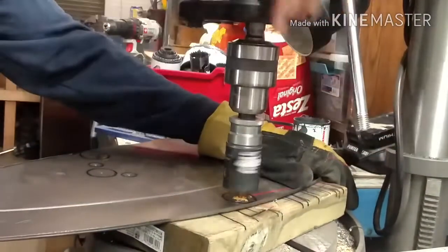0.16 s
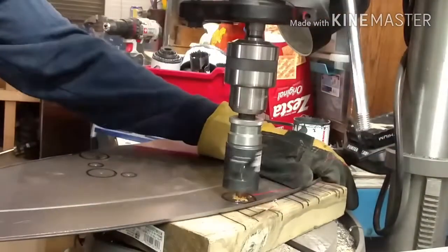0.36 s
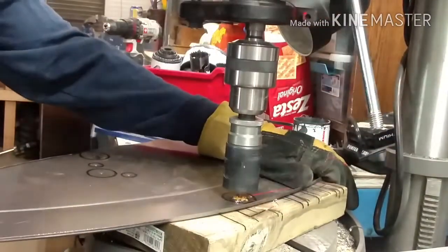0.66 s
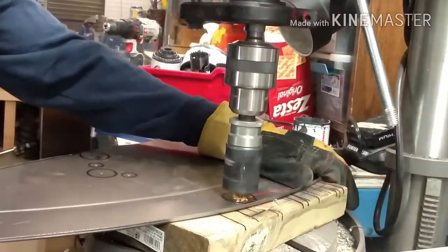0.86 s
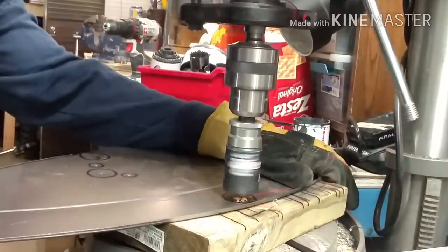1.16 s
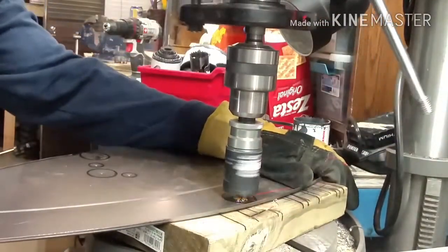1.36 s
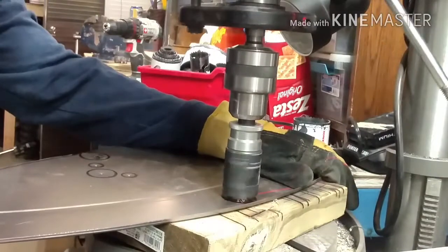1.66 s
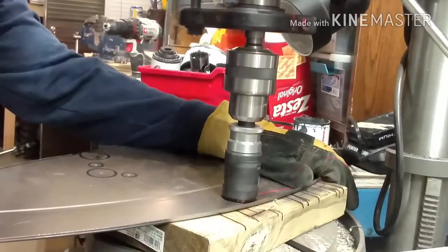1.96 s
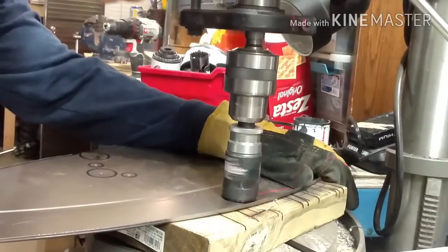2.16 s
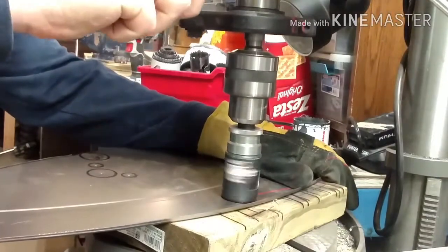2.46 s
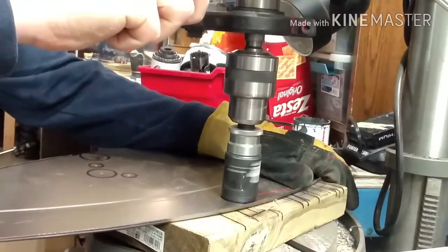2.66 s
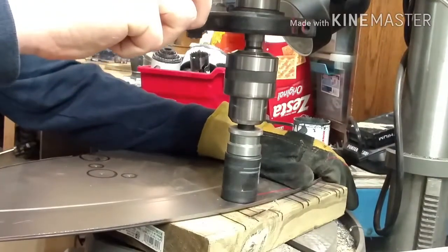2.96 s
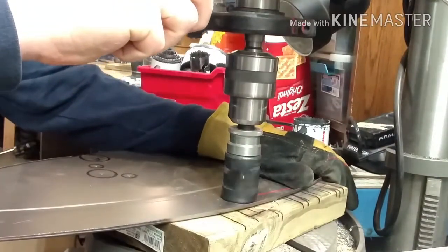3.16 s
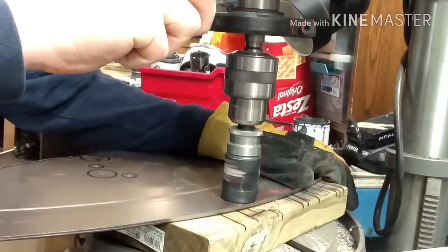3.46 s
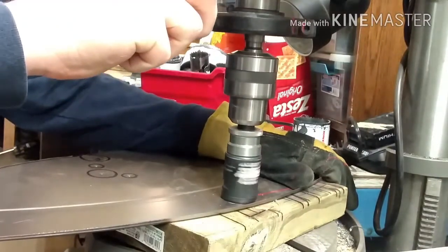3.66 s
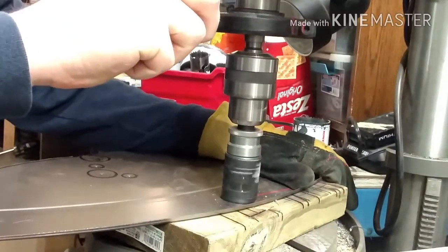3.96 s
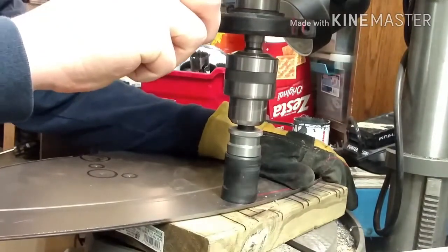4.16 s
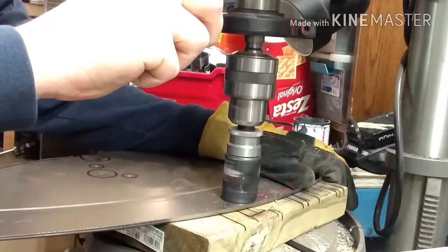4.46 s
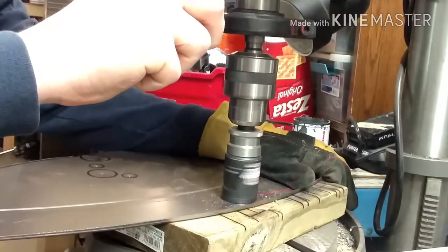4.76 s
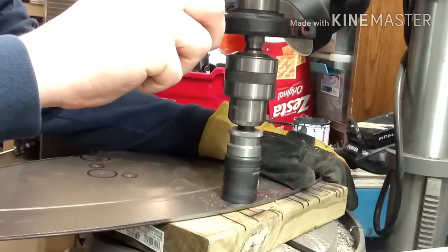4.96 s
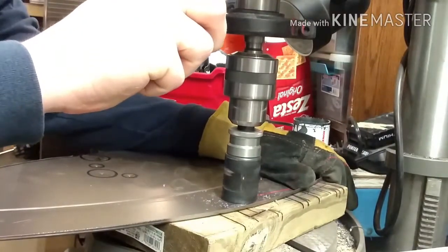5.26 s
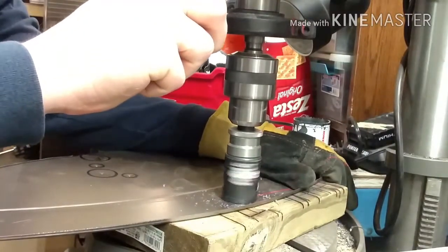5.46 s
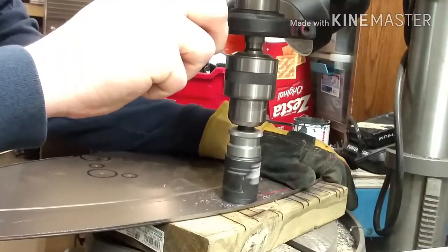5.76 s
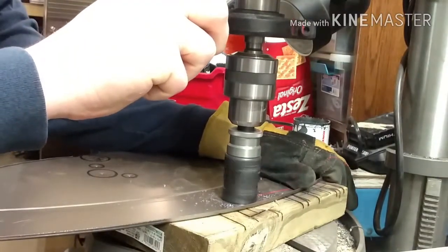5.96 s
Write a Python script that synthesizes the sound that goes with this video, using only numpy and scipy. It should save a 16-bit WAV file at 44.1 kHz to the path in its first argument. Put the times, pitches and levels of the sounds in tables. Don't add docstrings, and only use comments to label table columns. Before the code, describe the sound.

Close, steady motor drone with belt rumble, raspy saw teeth on sheet steel, short binding groans and irregular bright clicks of loose steel.

```python
import sys
import numpy as np
from scipy import signal
from scipy.fft import rfft, irfft, next_fast_len
from scipy.io import wavfile
from scipy.ndimage import uniform_filter1d

SR = 44100
rng = np.random.default_rng(int(sys.argv[2]) if len(sys.argv) > 2 else 0)


def magnitude_from_level(level_db):
    exponent = np.asarray(level_db, float) / 20
    return 10 ** exponent


def generate_wav(sig):
    pcm = np.round(np.clip(np.atleast_2d(sig).T, -1, 1) * 32767).astype(np.int16)
    wavfile.write(sys.argv[1], SR, pcm)


N = 269451
FFT_SIZE = next_fast_len(N)
TIME_S, FREQ_HZ = np.arange(N) / SR, np.fft.rfftfreq(FFT_SIZE, 1 / SR)

# time in seconds, pitch in Hz.
SPEED = [
    (0, 476.0),
    (3.0, 475.95),
    (3.6, 475.0),
    (4.4, 474.7),
    (4.8, 475.9),
    (6.11, 475.9),
]
# time in seconds, pressure from 0 to 1.
FEED = [
    (2.1, 0.21),
    (2.7, 0.92),
]
# time in seconds, level in dB.
HEAD_SHAKE = [(0.0, -15), (0.01, -17.5), (0.39, -16), (1.21, -16.5), (1.22, -17), (2.04, -17.5),
              (2.25, -15.5), (2.48, -17.5), (3.69, -16), (3.74, -19), (3.76, -17), (4.24, -16), (4.37, -19),
              (4.95, -16.5), (5.07, -13.5), (5.17, -16), (5.99, -17), (6.11, -17.5)]
MULTIPLES = (2, 4, 5, 6, 7, 9, 10, 13, 16, 17, 18, 20, 21, 22, 23, 25, 26, 27, 29, 30, 31, 32, 33, 34, 35,
             36, 37, 38, 39, 43)
# level in dB, change under feed in dB, side minus mid in dB.
ORDER_TONES = [(-60.5, -0.5, 1), (-51.5, -1, -1), (-55, 0.5, -3), (-56, -8, -14), (-42.5, -2, -4),
               (-40.5, 2, -5), (-36, -1.5, -2), (-44, 3.5, -10), (-20, -3, -11), (-30.5, 5.5, -11),
               (-52, 9.5, -7), (-40.5, -0.5, -11), (-38, -12.5, -4), (-38.5, -2.5, -12), (-40, 3, -7),
               (-26.5, -6, -28), (-32, 5, -22), (-28, -6, -20), (-33, 4.5, -5), (-38.5, 8, -16),
               (-29, 0, -20), (-39, 3.5, -15), (-40, 4, -18), (-39.5, 0, -14), (-41.5, -8, 3.5),
               (-28, -2.5, -21), (-33.5, -4.5, -20), (-36, -0.5, -28), (-40, 1.5, -18), (-39.5, 1.5, -14)]
# level, change under feed, side minus mid, all in dB.
FAINT_TONE = (-46, 0.1, -12)
# frequency in Hz, density in dB per Hz, side minus mid in dB,
# angle of side against mid in radians.
RUMBLE = [(20, -106, 5, -1.0), (99, -80.5, 7, -1), (212, -66, -17, -1.5), (288, -53, -10, -2),
          (352, -59.5, 2, 0), (479, -50, -13, -3.0), (670, -57.5, -5, -0.5), (772, -51, -10.5, 2),
          (910, -49.5, -9.5, -1), (1150, -54.5, -18, 0.5), (1393, -60, -18, 9.5), (1540, -70, -2, -17),
          (1990, -86.5, 6, -11), (2620, -110, -5, 9)]
# centre in seconds, length in seconds,
# groan in dB, scrape in dB.
BINDS = [(0.03, 0.091, 6, 5.5), (0.417, 0.21, 4.5, -0.2), (0.83, .08, 8, -0.5), (1.08, .2, 4.5, 1.5),
         (1.72, .1, 3, -0.5), (2.648, .1, 3, 1.5), (2.956, 0.21, 7, 2.5), (3.622, 0.12, 5, 1),
         (4.217, .12, 6, 3), (4.36, 0.13, 9, -1.5), (4.536, 0.15, 8.5, -1.5), (4.697, .1, 6, -3),
         (5.134, 0.17, 4, 4.5), (5.4, 0.16, 3, 2), (5.54, 0.091, 6.5, 3)]
# frequency in Hz, width in Hz, level in dB.
GROAN_MODES = [(1473, 58, 3), (1743, 28, -2), (1937, 124, -2.5), (2147, 68, -5.5)]
# frequency in Hz, level in dB.
SCRAPE_COLOUR = [(1200, -7), (1700, -8.5), (3000, 7), (4200, -12.5), (5200, 5.5), (6400, -9), (8000, -3),
                 (10300, -10), (13000, -17), (15400, -23), (15600, -38), (15900, -70)]
# time in seconds, peak in dB, body band in dB, bright band in dB.
TICKS = [(0.1605, -27, -31.5, -33), (0.4968, -25, -30, -35), (0.5975, -30, -31, -39),
         (0.8325, -29, -35, -38.5), (1.1347, -27, -25, -36), (1.3723, -29, -39, -39),
         (1.5726, -28, -31, -35), (1.7404, -32, -37, -47), (1.8083, -29, -35, -38.5), (1.91, -29, -29, -37),
         (1.943, -29, -38, -40), (2.1106, -32, -35, -43.5), (2.414, -28, -47, -38.5),
         (2.5142, -28, -41, -35), (2.582, -29, -35, -39), (3.0855, -28, -31, -36), (3.2206, -29, -30, -36),
         (3.692, -27, -24.5, -35), (3.928, -31, -42, -41), (3.9615, -25, -41, -33), (4.0622, -29, -38, -39),
         (4.131, -30, -30, -37.5), (4.2652, -30, -34, -40), (4.342, -19, -24, -30), (4.804, -28, -38, -34),
         (4.9725, -30, -33, -38.5), (5.172, -27, -34, -35.5), (5.342, -27, -30, -32.5),
         (5.477, -25, -34, -31.5), (5.7778, -26, -29, -36)]
# frequency in Hz, width in Hz, level in dB.
BODY_MODES = [(2274, 45, -1), (2712, 170, 8), (3070, 92, 1), (3324, 95, 5.5), (3707, 61, 1.5),
              (3890, 100, 4), (4400, 110, -3), (4576, 100, 0.5), (4800, 41, 3), (5500, 400, -1)]
# frequency in Hz, width in Hz, level in dB.
BRIGHT_MODES = [(6690, 6.8, -5.5), (6900, 48, -3), (7270, 220, -2.5), (8100, 100, 1.5), (8480, 210, 5.5),
                (9020, 140, -2.5), (9400, 54, 0), (10880, 340, -0.5), (11400, 150, -7), (14000, 200, -10),
                (14600, 100, -9)]
# frequency in Hz, width in Hz, level in dB.
CHIP = (8800, 40, -29)
# frequency in Hz, remainder in dB.
NULLS = [(1300, -16), (2450, -57), (3950, -8.5), (5250, -15), (6500, -24), (7780, -12), (9000, -22),
         (10350, -5), (11900, -14), (13000, -25), (14150, -11), (15500, -20)]
# frequency in Hz, left minus right in dB.
TILT = [(1500, -0.94), (2300, -3), (4000, -0.5), (8200, 2), (12000, 0.8)]
# frequency in Hz, level against surroundings in dB.
MASK = [(700, -60), (1500, -22), (2500, -11), (9000, -11), (11000, -5), (13000, -1.5), (15300, -1),
        (15800, 8)]

STRONG_SHARE, THROB_SHARE = 2.04, 0.51
SURGE_MAX_DB = 2.5


def curve(table, at):
    x, *columns = np.transpose(table)
    return [np.interp(at, x, column) for column in columns]


def log_curve(table, hz):
    return curve([(np.log(row[0]), *row[1:]) for row in table], np.log(hz + 1))


def shaped(x, gain):
    return irfft(rfft(x, FFT_SIZE) * gain, FFT_SIZE)[..., :N]


def walk(rate_hz, time_s=TIME_S):
    substeps = 8
    held = np.repeat(rng.standard_normal(400), substeps)
    slewed = uniform_filter1d(uniform_filter1d(held, substeps), substeps)
    return 1.37 * np.interp(time_s * rate_hz * substeps, np.arange(len(slewed)), slewed)


def fade(x, t60_s):
    return signal.lfilter([1], [1, -np.exp(-np.log(1000) / (t60_s * SR))], x)


def ring(x, hz, width_hz):
    b, a = signal.iirpeak(hz, hz / width_hz, SR)
    return signal.lfilter(b, a, x) / np.sqrt(np.pi * width_hz / SR)


def mains_hum(angle, time_s, feed):
    mains_hz, beat_s, level_db, held_db = 120.05, 1.33, -50.5, -20
    phase = 2 * np.pi * mains_hz * (time_s - beat_s) + np.interp(beat_s, time_s, angle)
    return np.sqrt(2) * magnitude_from_level(level_db + held_db * feed ** 4), phase


def motor(turns):
    wander_db, slip_rad, wander_hz = 2.0, 0.39, 7.0
    thin = 8
    time_s, turns = TIME_S[::thin], turns[::thin]
    shake_db = curve(HEAD_SHAKE, time_s)[0]
    shake_db = shake_db - np.mean(shake_db)
    feed = curve(FEED, time_s)[0]
    faint = [(k, FAINT_TONE) for k in range(11, 46) if k not in MULTIPLES]
    out = np.zeros((2, len(time_s)))
    for k, (db, feed_db, side_db) in [*zip(MULTIPLES, ORDER_TONES), *faint]:
        if k == 16:
            share = STRONG_SHARE
        elif k > 11:
            share = 1
        else:
            share = THROB_SHARE if k > 4 else 0
        calm = {2: 0.3, 4: 0.3, 16: 0.6, 17: 0.6}.get(k, 1.0)
        slip = np.sqrt(calm) * slip_rad * walk(wander_hz, time_s)
        angle = 2 * np.pi * (k * turns + rng.random()) + slip
        surge_db = np.minimum(share * shake_db, SURGE_MAX_DB)
        drift_db = calm * wander_db * walk(wander_hz, time_s)
        size = np.sqrt(2) * magnitude_from_level(db + feed_db * feed + surge_db + drift_db)
        lean = curve(RUMBLE, k * 28.1)[2] + 0.67 * walk(2.96, time_s)
        out += size * np.array([np.sin(angle), magnitude_from_level(side_db) * np.sin(angle + lean)])
        if k == 4:
            hum, phase = mains_hum(angle, time_s, feed)
            out += hum * np.array([np.sin(phase), magnitude_from_level(side_db) * np.sin(phase + lean)])
    return signal.resample_poly(out, thin, 1, axis=1)[:, :N]


def rumble(turns):
    swell, likeness, split_hz = 0.17, 0.8, 380
    shake_db = curve(HEAD_SHAKE, TIME_S)[0]
    throb_db = THROB_SHARE * shake_db + 1.8 * walk(3.96)
    throb_db = throb_db - np.mean(throb_db)
    drone_db = np.minimum(shake_db - np.mean(shake_db), SURGE_MAX_DB)
    db, side_db, angle = log_curve(RUMBLE, FREQ_HZ)
    noise = rng.standard_normal((2, N)) * np.sqrt(SR / 2)
    common, own = noise * (1 + swell * np.cos(2 * np.pi * turns))

    def pair(gain):
        side_gain = gain * magnitude_from_level(side_db)
        side = shaped(common, side_gain * likeness * np.exp(1j * angle))
        side += shaped(own, side_gain * np.sqrt(1 - likeness ** 2))
        return np.array([shaped(common, gain), side])

    low = 1 / (1 + (FREQ_HZ / split_hz) ** 8)
    return pair(magnitude_from_level(db) * low) * magnitude_from_level(throb_db) + pair(magnitude_from_level(db) * (1 - low)) * magnitude_from_level(drone_db)


def binding():
    return sum(np.outer(db, np.exp(-(2 * (TIME_S - s) / length_s) ** 2))
               for s, length_s, *db in BINDS)


def groan(groan_db):
    out = np.zeros((2, N))
    for hz, width_hz, db in GROAN_MODES:
        out += magnitude_from_level(db + 1.4 * walk(15.0)) * ring(rng.standard_normal((2, N)), hz, width_hz)
    return magnitude_from_level(-46 + groan_db) * out


def shaking(floor, at, blow_db, crack_s, tail_s, tail_db):
    blows = np.zeros(N)
    blows[at] = magnitude_from_level(blow_db) ** 2
    power = floor ** 2 + fade(blows, crack_s) + magnitude_from_level(tail_db) ** 2 * fade(blows, tail_s)
    return np.sqrt(power) * rng.standard_normal((2, N))


def struck(modes, colour, floor, at, blow_db, crack_s, tail_s, tail_db, scatter_db, flicker_db, click_db):
    modes_db = -10.5
    rasp = shaking(floor, at, blow_db, crack_s, tail_s, tail_db)
    rasp[:, at] += magnitude_from_level(blow_db + click_db) * rng.choice([-1, 1], (2, len(at)))
    out = shaped(rasp, colour / np.sqrt(np.mean(colour ** 2)))
    for hz, width_hz, db in modes:
        own_db = blow_db + scatter_db * rng.standard_normal(len(at))
        own_floor = floor * magnitude_from_level(flicker_db * walk(13.0))
        drive = shaking(own_floor, at, own_db, crack_s, tail_s, tail_db)
        out += magnitude_from_level(db + modes_db) * ring(drive, hz, width_hz)
    return out


def scrape_and_ticks(turns, bite_db):
    spindle_hz, spindle_s, wobble_db = 6.15, 0.16, 4
    tick_s, _, hard_body_db, hard_bright_db = np.transpose(TICKS)
    every = np.flatnonzero(np.diff(np.floor(turns + 0.21)))
    wobble = wobble_db * np.cos(2 * np.pi * spindle_hz * (every / SR - spindle_s))
    chance = rng.standard_normal((2, len(every)))
    at = np.append(every, (tick_s * SR).astype(int))
    body_db = np.append(-43.5 + wobble + 2.4 * chance[0], hard_body_db - 0.5)
    bright_db = np.append(-47.0 + wobble + 3.4 * chance[1], hard_bright_db - 0.4)

    chatter_db = 1.1 * walk(16.0) + 0.4 * walk(5.68)
    scrape_db = -41 + 0.2 * curve(FEED, TIME_S)[0] + bite_db
    colour = magnitude_from_level(log_curve(SCRAPE_COLOUR, FREQ_HZ)[0])
    below = 1 / (1 + (FREQ_HZ / 6000) ** 8)
    low = struck(BODY_MODES, colour * below, magnitude_from_level(scrape_db - 0.43 + chatter_db), at, body_db,
                 crack_s=0.014, tail_s=0.078, tail_db=-9.5, scatter_db=5.0, flicker_db=1.46, click_db=5.7)
    high = struck(BRIGHT_MODES, colour * (1 - below), magnitude_from_level(-49.5 + chatter_db), at, bright_db,
                  crack_s=0.015, tail_s=0.17, tail_db=-5.5, scatter_db=4.0, flicker_db=2.9, click_db=13.0)
    return low + high


def tick_edges():
    edge = np.zeros((2, N))
    tick_s, peak_db = np.transpose(TICKS)[:2]
    edge[:, (tick_s * SR).astype(int)] = magnitude_from_level(peak_db - 4.0) * rng.choice([-1, 1], (2, len(tick_s)))
    highpass = 1 / (1 + (10500 / (FREQ_HZ + 1)) ** 4)
    lowpass = 1 / (1 + (FREQ_HZ / 16000) ** 30)
    return shaped(edge, highpass * lowpass)


def chip():
    snap_s = 4.343
    hz, width_hz, db = CHIP
    snap = np.zeros((2, N))
    snap[:, int(snap_s * SR)] = magnitude_from_level(db) * np.sqrt(SR / width_hz)
    return ring(snap, hz, width_hz)


def ports(pair):
    hz, left_db = np.transpose(NULLS)
    null = np.interp(FREQ_HZ, hz, np.arange(len(hz)))
    turn = null * np.pi / 2
    left = magnitude_from_level(left_db[np.rint(null).astype(int)])
    return shaped(pair, np.hypot([np.cos(turn), np.sin(turn)], left))


def scene():
    turns = np.cumsum(curve(SPEED, TIME_S)[0] / 16) / SR
    groan_db, bite_db = binding()
    steel = groan(groan_db) + scrape_and_ticks(turns, bite_db) + tick_edges() + chip()
    mid, side = motor(turns) + rumble(turns) + ports(steel)
    tilt_db = curve(TILT, FREQ_HZ)[0]
    return shaped(np.array([mid + side, mid - side]), magnitude_from_level(np.array([tilt_db, -tilt_db]) / 2))


def masked(x):
    frame = 2048
    hz, _, parts = signal.stft(np.array([x[0] + x[1], x[0] - x[1]]) / 2, SR, "cosine", frame)
    power = uniform_filter1d(np.abs(parts) ** 2, size=3, axis=1)
    around = uniform_filter1d(power.sum(axis=0) / 2, size=41, axis=0)
    around = uniform_filter1d(around, size=45, axis=1)
    limit = around * magnitude_from_level(curve(MASK, hz)[0])[:, None] ** 2
    kept = parts * (power > limit)
    mid, side = signal.istft(kept, SR, "cosine", frame)[1][:, :N]
    return np.array([mid + side, mid - side])


def low_pass(x):
    return signal.sosfilt(signal.butter(12, 15800, fs=SR, output="sos"), x)


def record(dry):
    rounded = np.tanh(0.8 * dry) / 0.82
    return low_pass(masked(rounded))


dry = scene()
out = record(dry)
generate_wav(out)
```